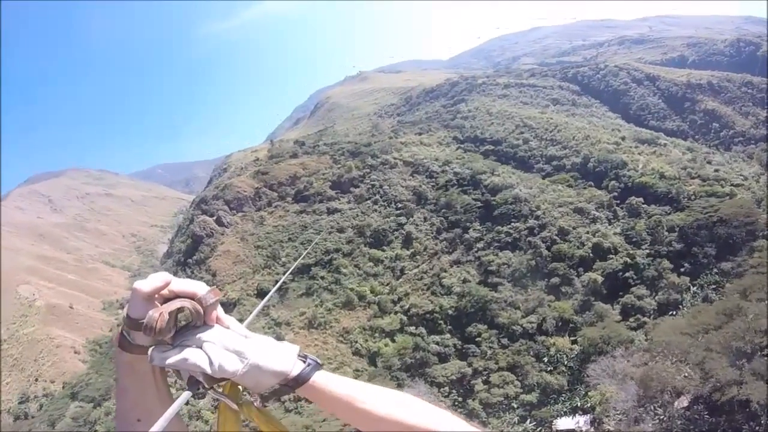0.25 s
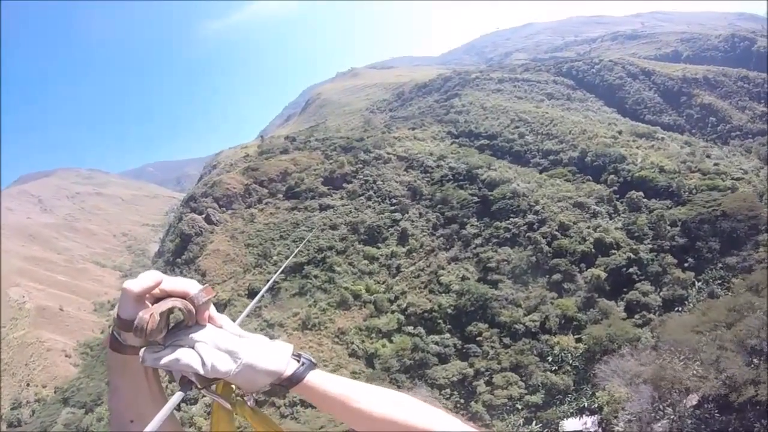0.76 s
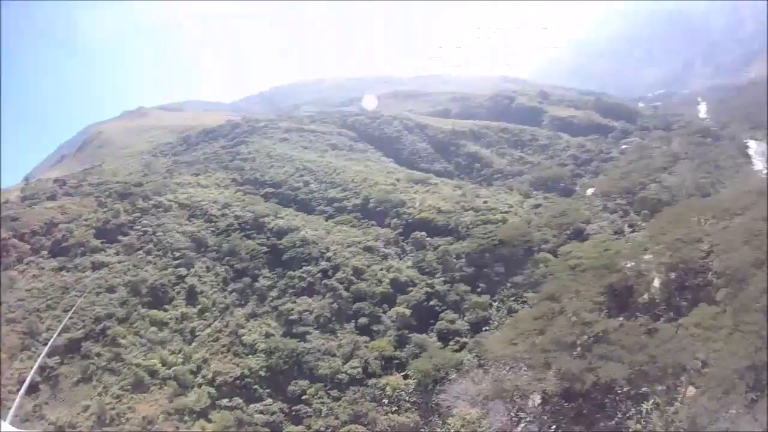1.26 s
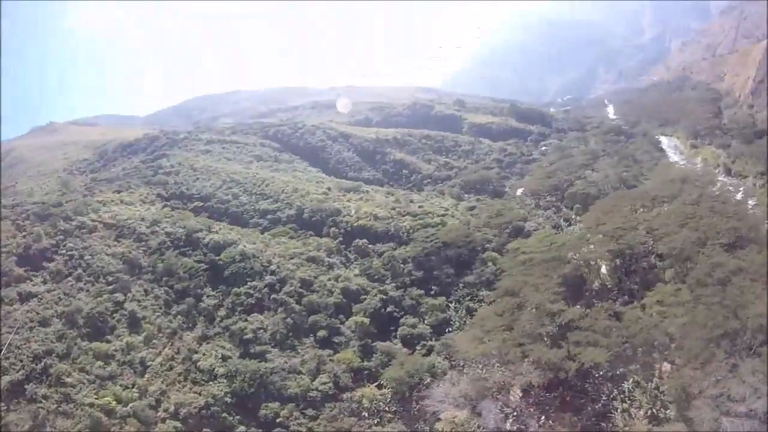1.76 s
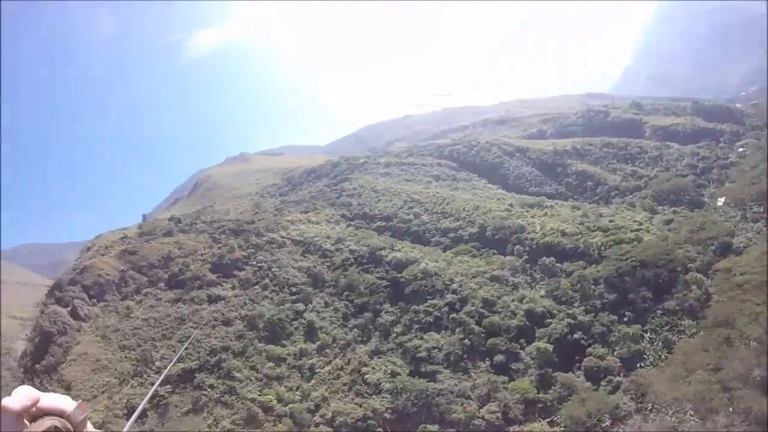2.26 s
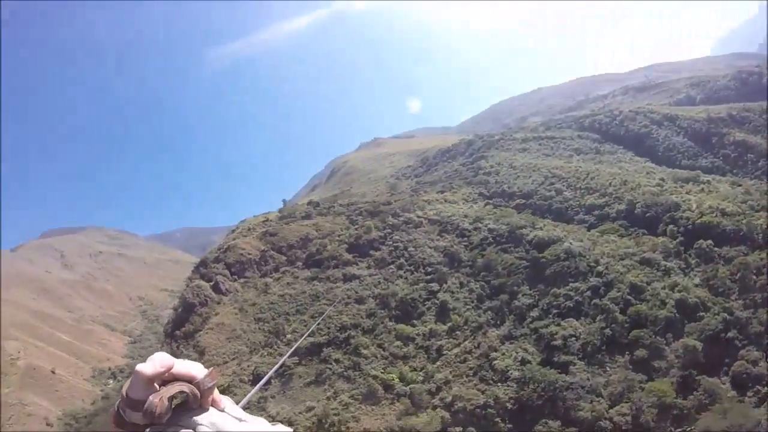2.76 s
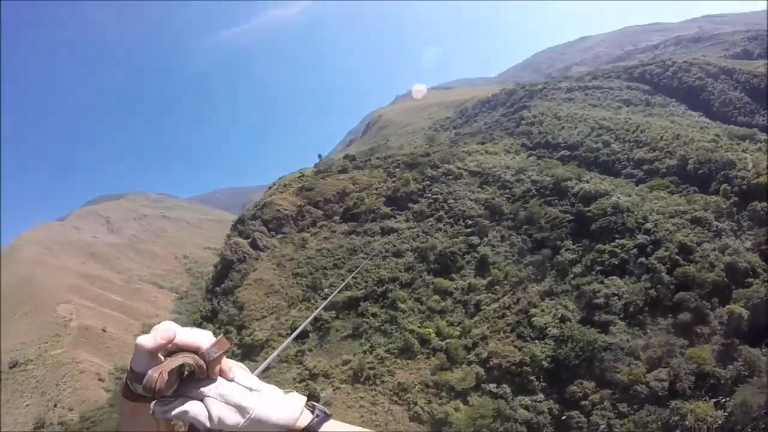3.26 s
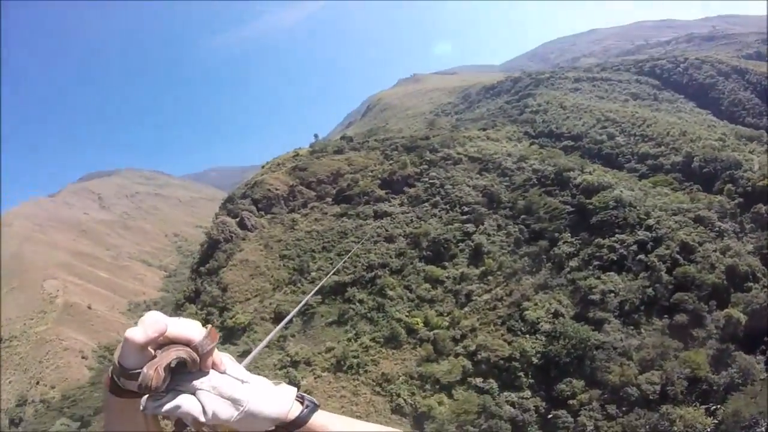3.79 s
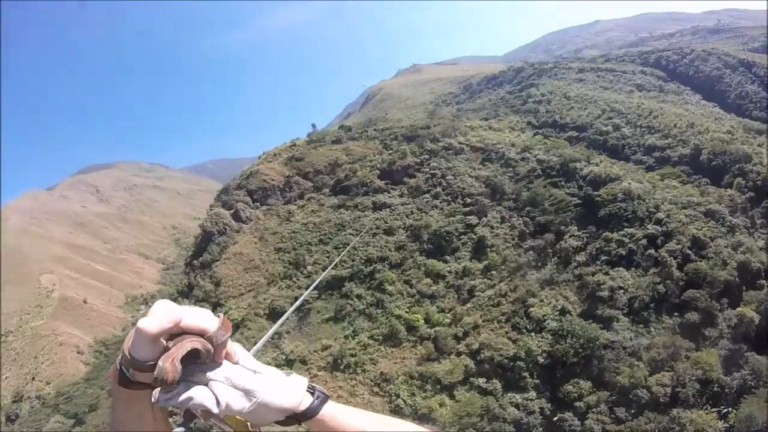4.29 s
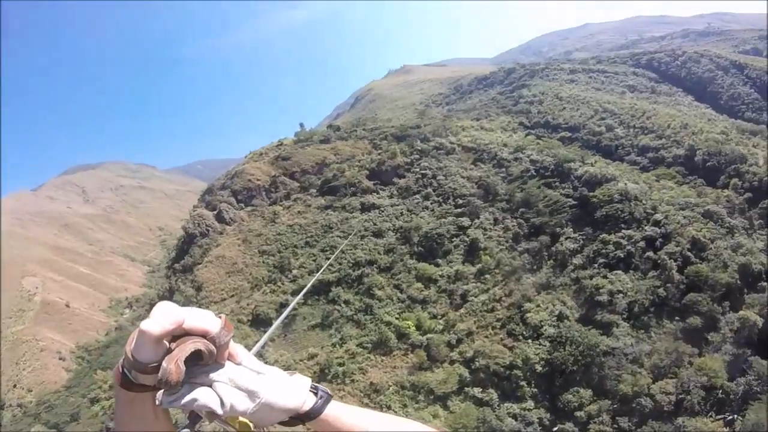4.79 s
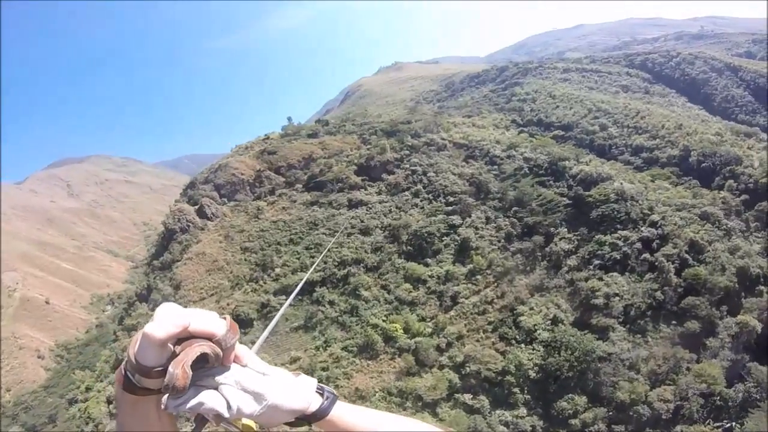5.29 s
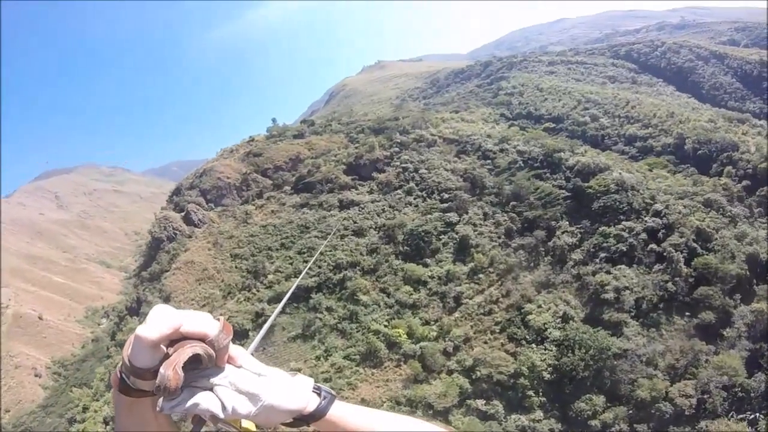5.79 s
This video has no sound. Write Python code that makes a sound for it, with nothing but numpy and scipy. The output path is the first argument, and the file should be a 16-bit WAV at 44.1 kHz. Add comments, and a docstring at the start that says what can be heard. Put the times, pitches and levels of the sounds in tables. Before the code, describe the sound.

Heard close up from the rider's head in the open air, pulley wheels sing along a zip-line cable, a metallic whine mixed with scraping hiss and buzz. Low wind buffets the microphone underneath, hooting softly once after about a second. The rolling noise softens a little and has tiny dropouts, and the whine's overtones swell and fade as its pitch gradually edges down.

```python
"""A zip-line trolley whines along a six-strand steel cable and slowly loses speed, heard at the rider's head.
The strands drum under the wheels, and the harmonics of this periodic force slide through narrow resonances.
Unequal strands add a buzz, and the rolling contact rasps through the resonances of the trolley's body.
The rider looks aside and leans back, which shades the treble. Air rumbles over the microphone and hoots
once as the head swings; the hiss skips now and then while the whine carries on."""
import sys
import numpy as np
from scipy.fft import rfft, irfft, next_fast_len
from scipy.io import wavfile
from scipy.ndimage import map_coordinates

SR = 44100
rng = np.random.default_rng(int(sys.argv[2]) if len(sys.argv) > 2 else 0)


def file_out(sig):
    """Save sig as 16-bit WAV at sys.argv[1]."""
    # one column per channel
    cols = np.atleast_2d(sig).T
    # limit, then scale
    lim = np.clip(cols, -1, 1)
    pcm = np.round(lim * 32767).astype(np.int16)
    wavfile.write(sys.argv[1], SR, pcm)


N = 266364

# Speed of the trolley as the rate of passing strands: t/s, f/Hz
STRAND_RATE = [(0, 1083.3), (0.2, 1086.9), (0.81, 1071.7), (1.31, 1069.9), (1.55, 1053.9), (1.8, 1068.1),
               (1.98, 1049.0), (2.32, 1057.6), (2.42, 1045.2), (3.12, 1036.2), (3.65, 1023.5),
               (3.72, 1011.7), (3.8, 1024.2), (4.16, 1005.4), (4.23, 1012.3), (4.3, 1001.3), (4.62, 993.0),
               (4.86, 995.4), (4.93, 980.4), (5, 984.1), (5.16, 972.0), (5.22, 983.7), (5.4, 981.4),
               (5.68, 960.6), (6.04, 962.1)]
# Harmonics of the strand rate, lowest first: level away from resonance/dB, flutter/dB
HARMONICS = [(-58, .4), (-53, 1.5), (-44, 1.3), (-48, 1.4), (-55.5, 1.2), (-49.5, 1.6), (-57, 1.6),
             (-58, 1.4)]


def whine(strands, flutter_hz, phase_rough, sway, wear_db):
    """Forced vibration: strands bump the wheels, and each harmonic swells as it crosses a resonance."""
    # Narrow resonances of wheels and cable: f/Hz, width/Hz, level/dB
    resonances = [(1001, 53, -39.4), (1079.8, 20, -33.9), (1967, 54, -36.3), (2064.6, 20, -33),
                  (2155, 47, -33), (2932, 27, -35), (3015, 34, -34), (3116, 22, -38), (3165, 42, -31.2),
                  (3230, 39, -26.1), (3918, 26, -41), (4017, 55, -32.8), (4078, 32, -33.4),
                  (4162, 43, -42.5), (5967, 54, -37.8), (6178, 84, -39.8), (6427, 71, -35.3),
                  (6915, 105, -40.6), (7072, 60, -41.6), (7391, 59, -45.9), (7556, 92, -39.6),
                  (8648, 47, -45)]
    centre, width, peak_db = np.transpose(resonances)
    rate_hz = glide()
    grid = np.linspace(rate_hz.min(), rate_hz.max(), 512)
    out = np.zeros(N)
    for multiple, (base_db, flutter_db) in enumerate(HARMONICS, 1):
        response = amp(peak_db) ** 2 @ resonance_power(multiple * grid, centre, width)
        resonant_power = np.interp(rate_hz, grid, response)
        base_power = amp(base_db + wear_db * wobble(8)) ** 2  # varies with the cable's wear
        rocking = unit(wobble(flutter_hz) + sway * wobble(11))  # rocking wheels make the level flutter
        jitter = phase_rough * flutter_db * wobble(70)
        tone = np.sqrt(2) * np.sin(2 * np.pi * multiple * strands + jitter)
        out += np.sqrt(resonant_power + base_power) * unit(amp(flutter_db * rocking)) * tone
    return out


def glide():
    """Deceleration: the smooth trend of the strand rate in Hz, without its lurches."""
    t = np.arange(N) / SR
    rate_hz, = curves(STRAND_RATE)
    return np.polyval(np.polyfit(t[::441], rate_hz[::441], 2), t)


def speed(bounce_hz, swing_hz, crest_s):
    """Frequency modulation: bouncing on the taut cable swings the strand rate, given in Hz."""
    t = np.arange(N) / SR
    rate_hz, = curves(STRAND_RATE)
    return rate_hz + swing_hz * np.cos(2 * np.pi * bounce_hz * (t - crest_s))


def buzz(strands, spread_db, drift, count=24, size=2048):
    """Periodic excitation: six unequal strands repeat once per twist, in a slowly changing profile."""
    # Orders 0 to 5 past each strand harmonic: relative level/dB
    lay_db = [3, -4.5, 1.5, -1, -2, 0]
    # Spectral tilt, strongest low down: f/Hz, relative level/dB
    tilt = [(1100, 2.5), (1500, 2.5), (2500, -1), (3500, 0.5), (5200, -1), (8500, 1), (11000, 0),
            (13000, -1)]
    orders = np.arange(7, 80)  # multiples of the twist rate
    shape = (count, len(orders))  # one row per profile along the cable
    level_db = np.take(lay_db, orders % len(lay_db)) + spread_db * rng.standard_normal(shape)
    phase = rng.uniform(0, 2 * np.pi, len(orders)) + drift * np.cumsum(rng.standard_normal(shape), axis=0)
    between = ~np.isin(orders / len(lay_db), 1 + np.arange(len(HARMONICS)))  # omit the whine's harmonics
    spectra = np.zeros((count, size // 2 + 1), complex)
    spectra[:, orders] = between * amp(level_db) * np.exp(1j * phase)
    twist = strands / len(lay_db) % 1
    position = [np.linspace(0, count - 1, N), twist * size]
    profile = map_coordinates(irfft(spectra), position, order=1, mode="grid-wrap")
    return unit(filtered(profile, lambda hz: amp(along(tilt, hz))))


def rasp(strands, bite):
    """Friction noise: fine wires scrape in the groove, a little harder on each strand's crest."""
    return unit(rng.standard_normal(N) * (1 + bite * np.cos(2 * np.pi * strands)))


def trolley(drive, cutoff_hz):
    """Modal filtering: the body's resonances colour the drive, shaded by each pose of the head."""
    # Body modes: f/Hz, width/Hz, relative level/dB with the head upright, aside, leaning back
    modes = [(1405, 348, -9, -9, -10), (1650, 26, -5, -43, -20), (1943, 263, -10.5, -13.5, -8),
             (2365, 207, -5, -3, -8.5), (2584, 373, -1.5, -2, -1.5), (3265, 383, -4, -6.5, -4.5),
             (4095, 260, -6.5, -10, -6.5), (4582, 267, -15.5, -12.5, -16), (5110, 350, -13, -27, -22),
             (6090, 503, -6.5, -7.5, -10), (6490, 289, -6.5, -6, -13.5), (6976, 210, -8.5, -17, -8.5),
             (7630, 490, -6, -18, -17.5), (7870, 600, -43, -16.5, -14.5), (8920, 650, -7.5, -30, -11),
             (9250, 440, -47, -14, -10.5), (9900, 260, -22, -22, -41), (10530, 980, -20.5, -22, -18),
             (12180, 660, -20.5, -26.5, -23), (13338, 740, -47, -29, -28), (14380, 2000, -36, -31, -36)]
    # Movement of the head: t/s, pose (0 upright, 1 aside, 2 leaning back)
    head = [(0, .27), (1.1, .12), (1.4, .56), (1.7, .75), (2.2, .72), (2.55, 1), (3.2, 2), (6.04, 1.95)]
    pose, = curves(head)
    centre, width, *poses = np.transpose(modes)
    grid = np.linspace(0, SR / 2, 2048)
    shapes = resonance_power(grid, centre, width)
    radiated = 1 - 1 / (1 + (grid / cutoff_hz) ** 10)  # small plates give off no bass
    out = np.zeros(N)
    for k, mode_db in enumerate(poses):
        gain = np.sqrt(amp(mode_db) ** 2 @ shapes) * radiated
        share = np.clip(1 - abs(pose - k), 0, 1)
        out += share * unit(filtered(drive, lambda hz: np.interp(hz, grid, gain)))
    return out


def wind(pace, rumble_db, gust_db, rush_db):
    """Turbulence at the microphone: a rumble in proportion to pace (speed over its mean), an even rush."""
    # Rumble spectrum, booming near 105 Hz: f/Hz, relative level/dB
    spectrum = [(12, -28), (24, -5.5), (40, -3.5), (70, -4.5), (90, -1), (106, 2), (135, -4.5), (200, -10),
                (300, -16.5), (540, -19.5), (740, -30.5), (900, -27), (1200, -46), (2000, -120)]
    rumble = unit(filtered(rng.standard_normal(N), lambda hz: amp(along(spectrum, hz))))
    rush = unit(filtered(rng.standard_normal(N), lambda hz: 1 / (1 + (hz / 1800) ** 2)))
    gusts = amp(gust_db * wobble(16))
    return amp(rumble_db) * pace * unit(rumble * gusts) + amp(rush_db) * rush


def skipping(hiss, half_width_s, widen_s_per_db):
    """Amplitude modulation: some bands of the hiss dip briefly, and deeper dips last longer."""
    # Dips: t/s, level/dB
    skips = [(.313, -13), (.487, -11), (.547, -12), (.622, -28), (.677, -13), (.932, -12), (1.017, -13),
             (1.134, -28), (1.337, -14), (2.148, -12), (2.403, -8), (3.450, -10), (3.513, -10),
             (4.408, -10), (4.922, -13), (5.497, -11), (5.687, -8)]
    # What stays through a dip: f/Hz, share of the amplitude (0 to 1)
    stays = [(120, 1), (230, 0), (900, 0), (1400, .45), (1600, 0), (1900, 0), (2300, .8), (3200, .65),
             (3650, 0), (4150, .7), (4600, 0), (5500, 0), (6200, .9), (7000, .05), (7600, .75), (9100, .65),
             (9700, 0)]
    t = np.arange(N) / SR
    dip_db = sum(depth_db * np.exp(-((t - at_s) / (half_width_s + widen_s_per_db * abs(depth_db))) ** 2)
                 for at_s, depth_db in skips)
    steady = filtered(hiss, lambda hz: np.clip(along(stays, hz), 0, 1))
    return steady + amp(dip_db) * (hiss - steady)


def hoot(rough):
    """Vortex shedding: eddies leave the edge of a head-worn camera and give a breathy low tone."""
    # The tone as the head swings aside: t/s, f/Hz, level/dB
    shedding = [(1.08, 180, -80), (1.12, 189, -43), (1.15, 193, -44), (1.18, 219, -47), (1.23, 221, -51),
                (1.29, 184, -50), (1.34, 135, -42), (1.4, 115, -79)]
    hz, level_db = curves(shedding)
    phase = 2 * np.pi * np.cumsum(hz) / SR + rough * wobble(60)
    return amp(level_db) * unit(np.sin(phase) * (1 + rough * wobble(49.7)))


def resonance_power(hz, centre, width):
    """Power response of each resonance (rows); width is the half-power bandwidth."""
    detune = 2 * (hz - centre[:, None]) / width[:, None]
    return (1 + (2 ** (1 / 6) - 1) * detune ** 2) ** -6


def amp(db):
    """Decibels to amplitude ratio."""
    return 10 ** (np.asarray(db) / 20)


def unit(x):
    """Normalisation to rms 1."""
    return x / np.sqrt(np.mean(x ** 2) + 1e-20)


def along(points, hz):
    """Interpolation of (f/Hz, value) points on a logarithmic frequency axis."""
    f, v = np.transpose(points)
    return np.interp(np.log(hz + 1), np.log(f + 1), v)


def curves(rows):
    """Linear interpolation: one value per sample for each column after t/s."""
    times, *columns = np.transpose(rows)
    return [np.interp(np.arange(N) / SR, times, column) for column in columns]


def wobble(rate):
    """Smooth random fluctuation of rms 1, with rate knots a second."""
    place = np.arange(N) * rate / SR
    knots, i = rng.standard_normal(4096), place.astype(int)
    ease = (1 - np.cos(np.pi * (place - i))) / 2
    return unit(knots.take(i, mode="wrap") * (1 - ease) + knots.take(i + 1, mode="wrap") * ease)


def filtered(x, response):
    """Linear filtering: the spectrum of x times a frequency response."""
    size = next_fast_len(N + 8192)
    return irfft(rfft(x, size) * response(np.fft.rfftfreq(size, 1 / SR)), size)[:N]


def scene():
    """Superposition: one rolling speed drives whine, buzz, rasp and wind; the hoot adds to them."""
    # Rolling contact: t/s, level/dB
    contact = [(0, -27), (1.3, -27.9), (1.7, -29.4), (2.3, -29.6), (2.8, -30.7), (4.1, -30.9), (5.2, -29.4),
               (6.04, -31.1)]
    contact_db, = curves(contact)
    strand_hz = speed(bounce_hz=5.19, swing_hz=1.9, crest_s=.011)
    strands = np.cumsum(strand_hz * (1 + .002 * wobble(32))) / SR  # strands passed; the twist is uneven
    drive = rasp(strands, bite=0.081) + amp(-5) * buzz(strands, spread_db=4, drift=.5)
    rolling = amp(contact_db + 0.3 * wobble(45)) * trolley(drive, cutoff_hz=920)
    singing = whine(strands, flutter_hz=55, phase_rough=0.13, sway=.45, wear_db=3)
    air = wind(strand_hz / strand_hz.mean(), rumble_db=-41.1, gust_db=0.94, rush_db=-53.5)
    hiss = skipping(rolling + air, half_width_s=.003, widen_s_per_db=.00036)
    return (singing + hiss + hoot(rough=0.32))[None]


def record(dry):
    """Band limiting: an ideal low-pass filter removes the highest treble."""
    top_hz = 15280
    return np.array([filtered(channel, lambda hz: hz < top_hz) for channel in dry])


dry = scene()
out = record(dry)
file_out(out)
```